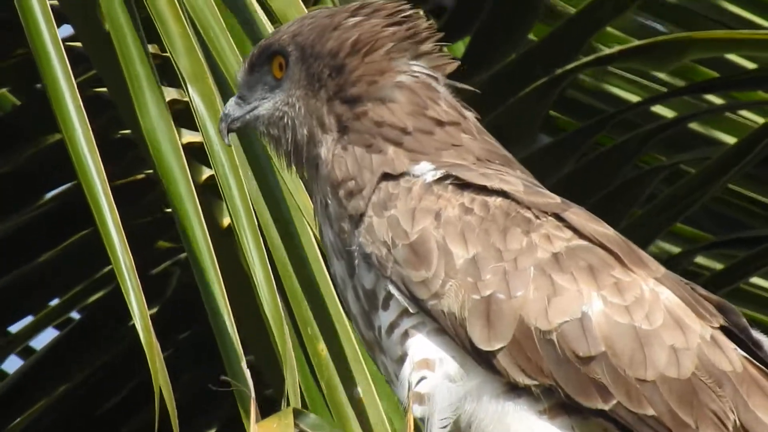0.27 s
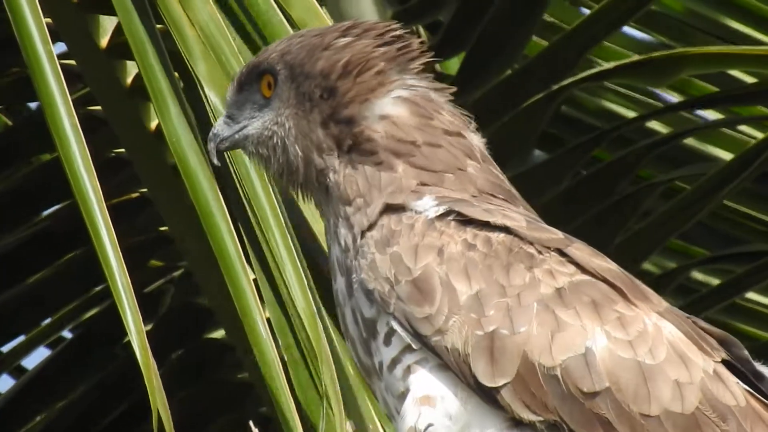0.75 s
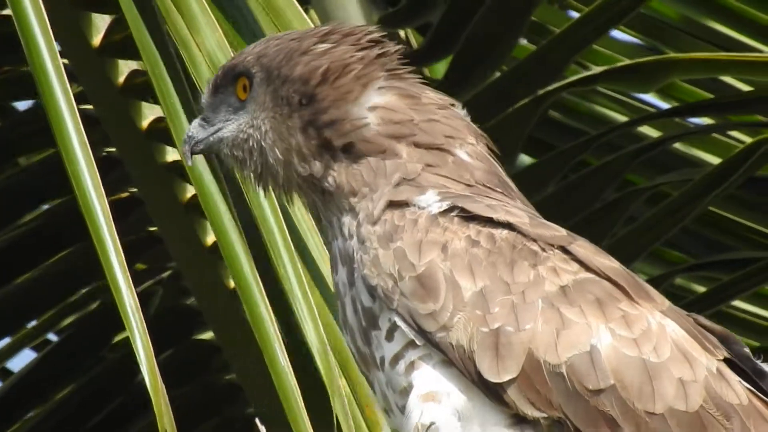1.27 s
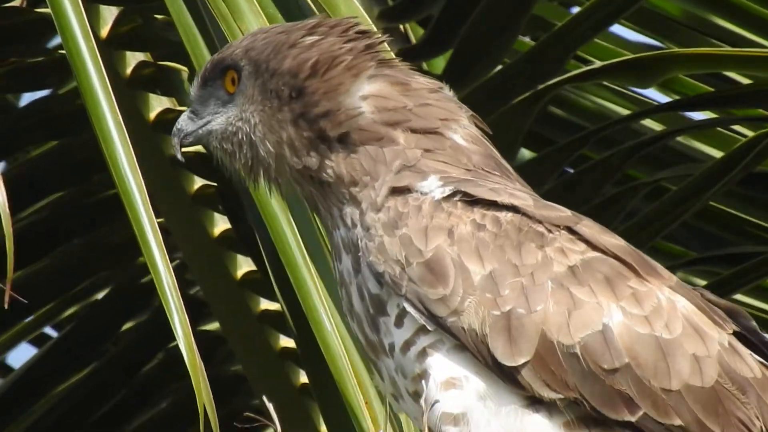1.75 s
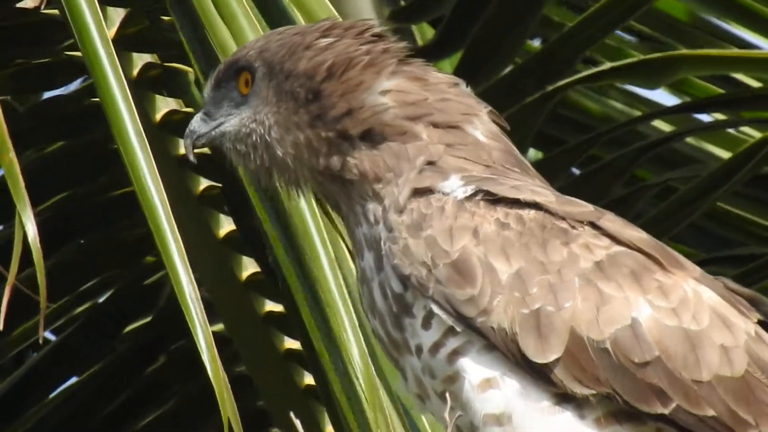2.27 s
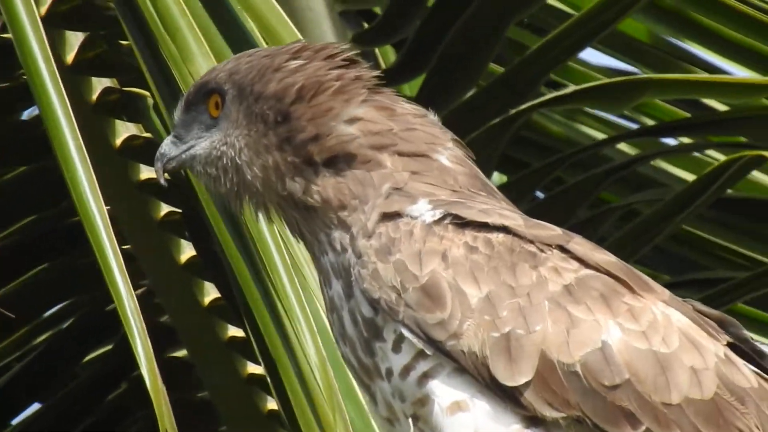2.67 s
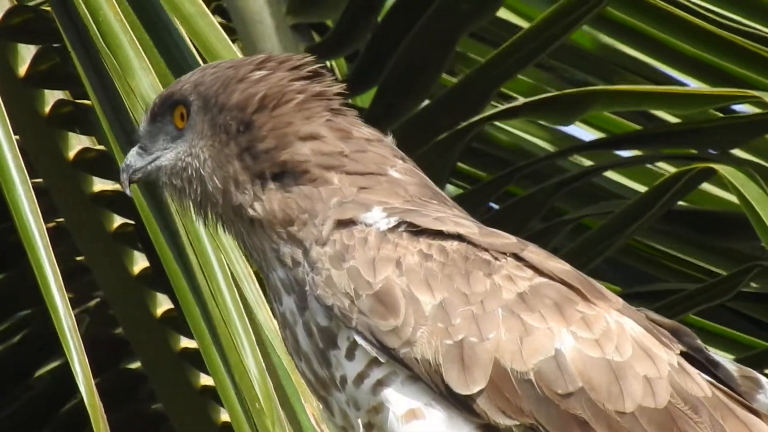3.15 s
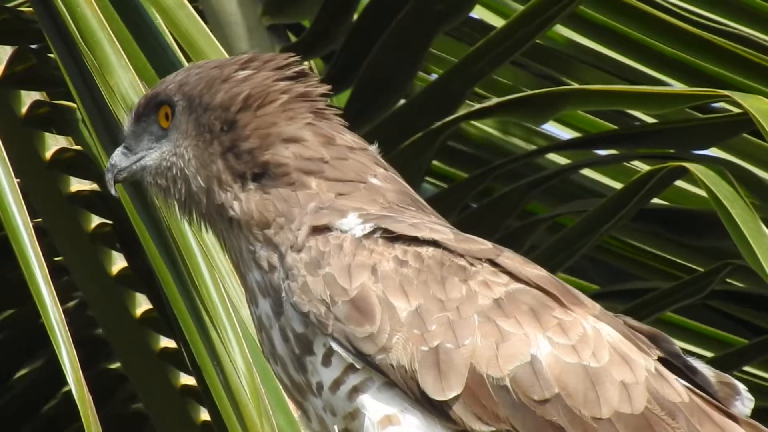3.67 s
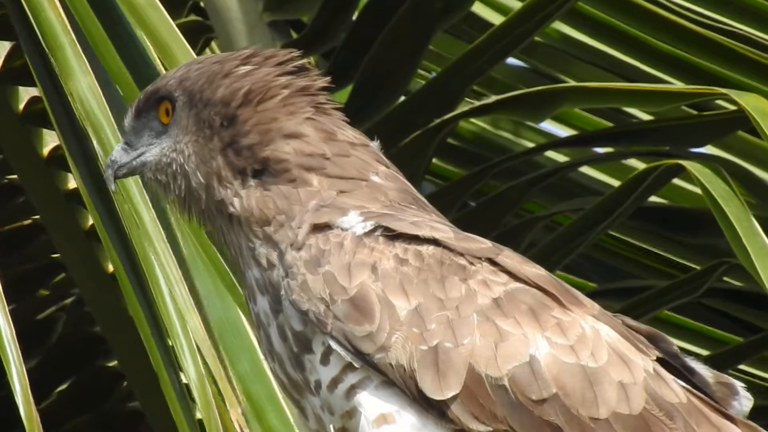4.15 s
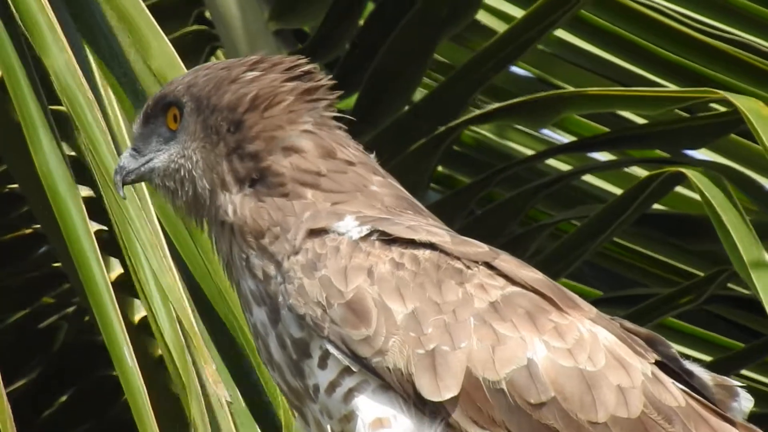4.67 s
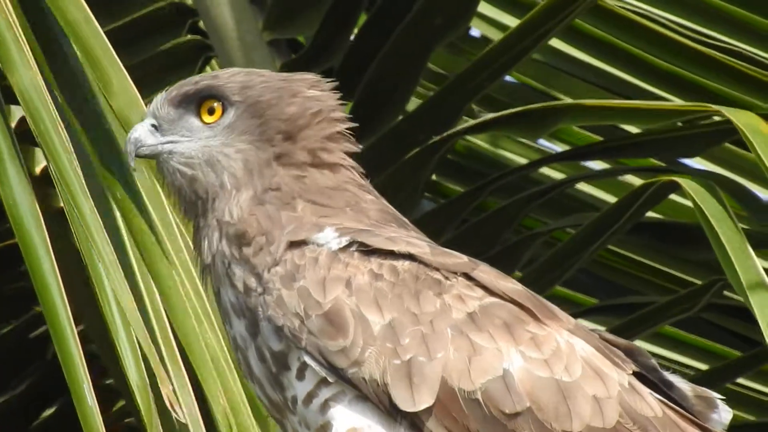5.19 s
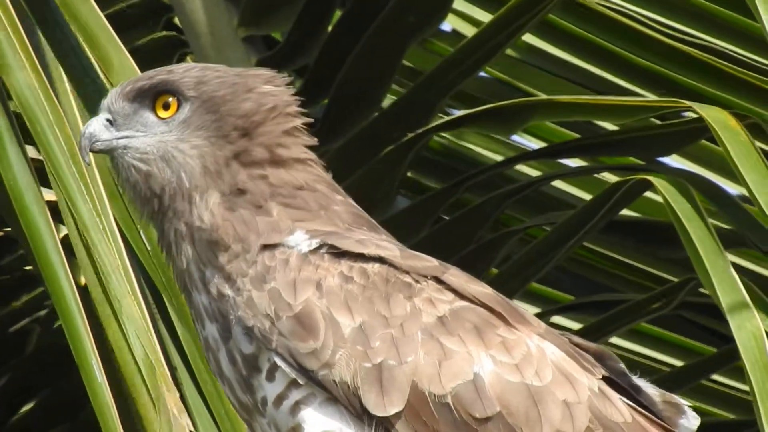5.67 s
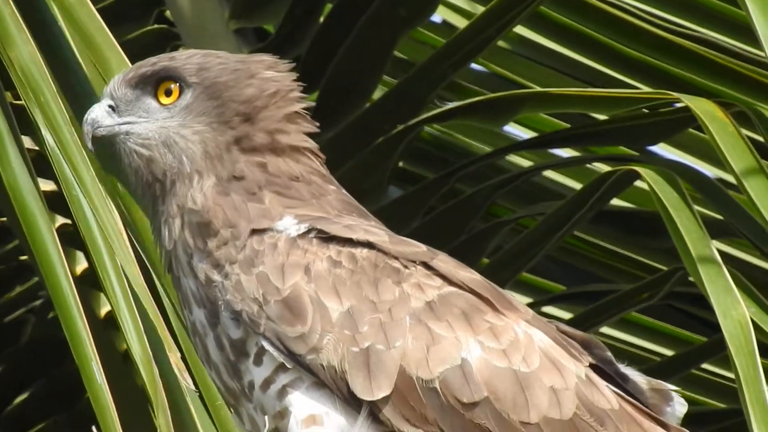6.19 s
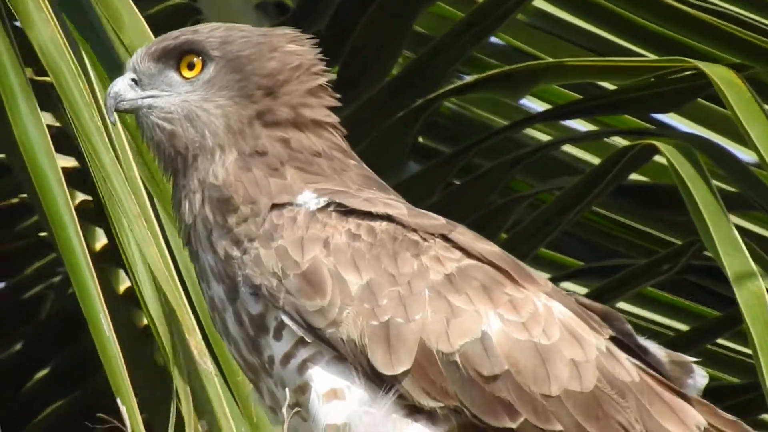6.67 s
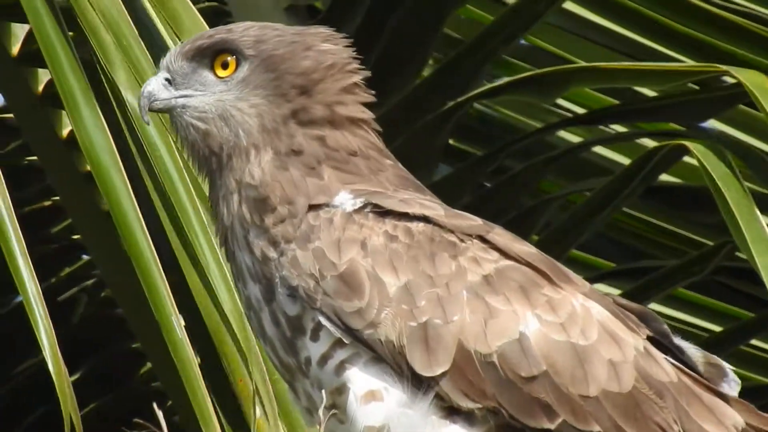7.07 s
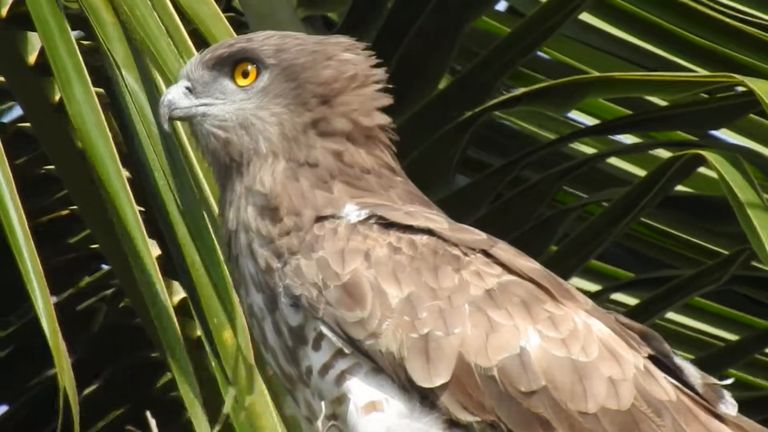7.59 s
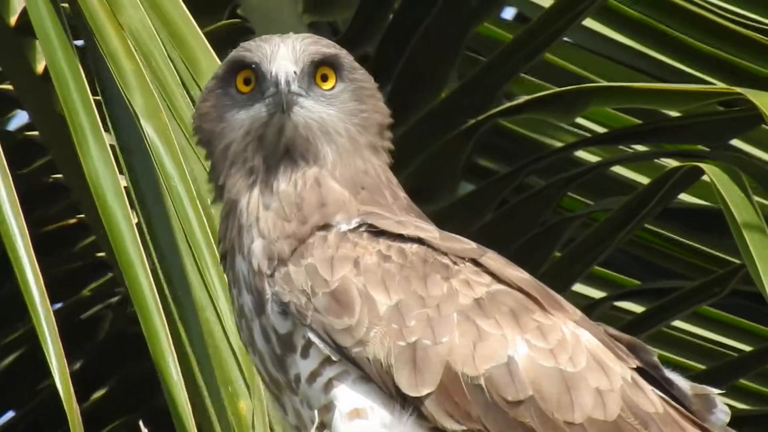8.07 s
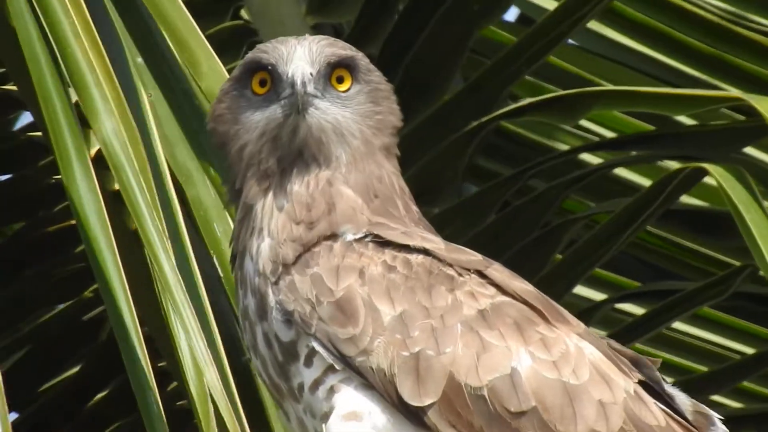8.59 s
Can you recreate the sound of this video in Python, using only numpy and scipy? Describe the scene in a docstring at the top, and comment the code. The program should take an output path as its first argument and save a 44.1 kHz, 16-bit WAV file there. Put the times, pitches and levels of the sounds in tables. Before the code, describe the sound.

Outdoors among palm leaves, agitated small birds scold almost without pause. Short, harsh, rising squawks stand out slightly right, a buzzing churr bursts on the left, and hoarse rasps, thin chips and low coos sit behind. A far engine chugs quickly and evenly as a vehicle drone fades. One soft knock touches the left of the close stereo microphone at about two seconds.

```python
"""Small birds scold from the palms: squawks and rasps on the right, a churring bird on the left,
with thin chips, deeper coos and far croaks. Squawks are voiced pulses and breath through moving resonances;
rasps and coos are uneven clicks, churrs gated noise, croaks slow pulses, chips whistles.
A far single-cylinder pump engine thumps and a vehicle drones off, both sums of sines; patchy noise is the
open air, and one soft knock lands on the left of two close microphone ports."""
import sys
import numpy as np
from scipy import signal
from scipy.fft import rfft, irfft, next_fast_len
from scipy.io import wavfile
from scipy.ndimage import uniform_filter1d

SR = 44100
rng = np.random.default_rng(int(sys.argv[2]) if len(sys.argv) > 2 else 0)


def waveform_to_disk(signal):
    """Save audio, clipped to [-1, 1], as 16-bit WAV at the path in sys.argv[1]."""
    frames = np.transpose(np.atleast_2d(signal))
    scaled = np.clip(frames, -1, 1) * 32767
    samples = np.round(scaled).astype(np.int16)
    wavfile.write(sys.argv[1], SR, samples)


N = 389403
T = np.arange(N) / SR


def gain_of(db):
    """Decibels to an amplitude factor."""
    return 10 ** (np.asarray(db) / 20)


def gain_of_ports(db):
    """Level offset of the two ports: left down, right up by db."""
    return gain_of([[-db], [db]])


def evened(x):
    """Scale to unit power."""
    return x / np.sqrt(np.mean(x ** 2) + 1e-20)


def read(points, hz):
    """Interpolate a spectrum table over log frequency."""
    f, value = np.transpose(points)
    return np.interp(np.log(hz + 1), np.log(f + 1), value)


def curves(rows):
    """Interpolate each column of a time table to one value a sample."""
    s, *columns = np.transpose(rows)
    return [np.interp(T, s, c) for c in columns]


def wander(seconds):
    """Smooth random drift of unit power: noise averaged twice."""
    size = max(round(seconds * SR), 1)
    noise = rng.standard_normal(N)
    return evened(uniform_filter1d(uniform_filter1d(noise, size), size))


def resonate(x, hz, width_hz):
    """Steep resonance: shift hz down to zero, smooth twice, shift back."""
    turn = np.exp(2j * np.pi * np.cumsum(hz * np.ones(N)) / SR)
    r = np.exp(-np.pi * width_hz / SR)
    smooth = signal.lfilter([1], [1, -2 * r, r * r], x / turn)
    return evened((turn * smooth).real)


def throat(x, modes):
    """Several resonances side by side, summed to unit power."""
    return evened(sum(gain_of(db) * resonate(x, hz, width_hz) for hz, width_hz, db in modes))


def placed(x, left_lag_samples, left_db, wet_db):
    """Bird at an angle: left port lagged and scaled; leaves scatter a short tail, other in each port."""
    size = next_fast_len(N)
    delay = np.exp(-2j * np.pi * np.fft.rfftfreq(size) * left_lag_samples)
    left = gain_of(left_db) * irfft(rfft(x, size) * delay, size)[:N]
    t = np.arange(SR // 4) / SR
    decay = gain_of(-60 * t / .13) * (t > .003)  # 60 dB in .13 s, from 3 ms on
    tail = rng.standard_normal((2, len(t))) * decay
    tail *= gain_of(wet_db) / np.linalg.norm(tail[0])
    return np.array([left, x]) + signal.oaconvolve(x[None], tail, axes=1)[:, :N]


# left-right likeness of the air: [f/Hz, share]
AIR_LIKENESS = [(60, 0.95), (240, 0.41), (900, 0.92), (2500, 0.76), (5000, 0.3), (9000, 0.035)]
# shape of the air spectrum: [f/Hz, relative density/dB per Hz]
AIR_SPECTRUM = [(25, -15), (54, -3), (155, -4.5), (277, -22), (589, -20.5), (1410, -17.5), (2080, -12.5),
                (4320, -16), (6370, -20.5), (8320, -25.5), (10800, -23.5), (15700, -35)]
# brief level changes, mostly dips, in the air's treble: [middle t/s, half length/s, level/dB]
LULLS = [(0.038, 0.043, -11), (0.486, 0.029, -14), (1.722, 0.024, -4), (1.997, .03, -8), (2.924, 0.031, -1),
         (3.839, 0.029, -4.5), (4.019, 0.026, -2), (5.015, 0.041, -1.5), (6.126, 0.021, -1.5),
         (6.367, .03, -5), (8.099, 0.037, -5), (8.549, 0.042, 0.5)]
AIR_DB = -42.5  # before the .7 dB port offset


def air():
    """Distant calls, leaves and rumble blur into patchy noise, shaped frame by frame."""
    frames, hz = N // 256 + 5, np.fft.rfftfreq(1024, 1 / SR)
    a, b, c, d, patches = rng.standard_normal((frames, 513, 5)).T
    patches = evened(uniform_filter1d(uniform_filter1d(patches, 10, 0), 12, 1))
    same = np.clip(read(AIR_LIKENESS, hz), -1, 1)[:, None]
    left = a + 1j * b
    right = same * left + np.sqrt(1 - same ** 2) * (c + 1j * d)
    spectrum = np.array([left, right])
    below_9k = (hz < 9000)[:, None]
    patch_db = 3.6 * patches * np.clip(hz / 1500, .3, 1)[:, None] * below_9k
    spectrum *= gain_of(read(AIR_SPECTRUM, hz)[:, None] + patch_db)
    t = np.arange(frames) * 256 / SR
    lull_db = sum(db * np.exp(-((t - s) / half_s) ** 2) for s, half_s, db in LULLS)
    spectrum *= gain_of(lull_db * np.clip(hz / 1200 - .3, 0, 1)[:, None] * below_9k)
    noise = signal.istft(spectrum, nperseg=1024, noverlap=768)[1][:, :N]
    return gain_of(AIR_DB) * evened(noise) * gain_of_ports(.7)


# vehicle, main line: [t/s, f/Hz, relative level/dB]
DRONE = [(0, 145.4, -50), (1.4, 141.6, -51), (2.6, 142.8, -54.5), (4.3, 148.3, -56), (5.8, 149.4, -62),
         (8.83, 158, -104)]


def vehicle():
    """Two unsteady lines in a fixed ratio; the pitch sags, then rises as the main line fades."""
    hz, db = curves(DRONE)
    turns = np.cumsum(hz * (1 + 0.00805 * wander(0.14))) / SR
    main = np.sin(2 * np.pi * turns)
    lower = gain_of(-6.5 + 1.4 * T) * np.sin(2 * np.pi * .795 * turns)
    return np.sqrt(2) * gain_of(db + 1.1 * wander(0.13)) * (main + lower)


# pump engine speed: [t/s, firings/Hz]
PUMP_SPEED = [(0, 8.752), (1, 8.755), (2, 8.776), (4, 8.784), (5, 8.762), (6, 8.75), (8.83, 8.749)]
# pump spectrum: [multiple of the firing rate, relative level/dB]
PUMP_ORDERS = [(4, -65), (5, -56), (6, -66), (7, -54), (8, -56), (9, -59), (10, -58), (11, -62), (12, -64),
               (13, -65), (15, -65), (17, -66)]
PUMP_LAG_CYCLES = .09  # first thump


def pump_engine():
    """All orders of the firing rate meet once a cycle in a thump."""
    turns = np.cumsum(curves(PUMP_SPEED)[0]) / SR - PUMP_LAG_CYCLES
    orders, order_db = np.transpose(PUMP_ORDERS)
    pump = 0
    for k in range(4, 18):
        pump = pump - gain_of(np.interp(k, orders, order_db)) * np.cos(2 * np.pi * k * turns)
    return np.sqrt(2) * pump * gain_of(-1.34 + 1.2 * wander(0.07))


# soft knock on the left port: [t/s, f/Hz, level/dB]
BUMP = (2.11, 85, -31)


def bump():
    """One short low swing, weaker and opposed in the right port."""
    s, hz, db = BUMP
    swing = np.exp(-((T - s) / 0.015) ** 2) * np.sin(2 * np.pi * hz * (T - s))
    return gain_of(db) * swing * [[1], [-.3]]


# [start t/s, length/s, pulse rate/Hz, relative level/dB]
CROAKS = [(6.56, .2, 77, -41), (7.535, .225, 77, -36)]
# [f/Hz, width/Hz, relative level/dB]
CROAK_THROAT = [(1010, 90, 0), (1400, 90, -2), (1850, 100, -1), (3100, 200, -5)]


def croaks():
    """Slow even pulses, each ringing a large throat."""
    pulses = np.zeros(N)
    for start, length, per_s, db in CROAKS:
        s = np.arange(0, length, 1 / per_s)
        arch = np.sin(np.pi * (s + 0.014) / (length + 0.029)) ** .5
        size = gain_of(db + 2 * rng.standard_normal(len(s)))
        pulses[((start + s) * SR).astype(int)] = size * arch
    t = np.arange(900) / SR
    ring = sum(gain_of(db) * np.exp(-np.pi * width_hz * t) * np.sin(2 * np.pi * hz * t)
               for hz, width_hz, db in CROAK_THROAT)
    return signal.oaconvolve(pulses, ring * np.clip(t / .002, 0, 1))[:N]


# [start t/s, relative level/dB]
CHIPS = [(.05, -42), (1.985, -41), (3.495, -43), (3.87, -42), (5.085, -42.5), (5.461, -41), (6.25, -39.5),
         (8.601, -39.5)]
# course of one chip: [t/s, f/Hz, level/dB re chip]
CHIP_SONG = [(0, 4550, 3), (.02, 4540, 4), (0.038, 4100, 2.5), (.05, 4100, -16), (.065, 4560, -3),
             (.11, 4450, -17)]


def chips():
    """A thin whistle that drops, then a fainter, nearly flat one."""
    out = np.zeros(N)
    s, hz, db = np.transpose(CHIP_SONG)
    t = np.arange(0, s[-1], 1 / SR)
    phase = 2 * np.pi * np.cumsum(np.interp(t, s, hz)) / SR
    tone = (np.sin(phase) + .12 * np.sin(2 * phase)) * signal.windows.tukey(len(t), .1)
    for start, level_db in CHIPS:
        out[round(start * SR):][:len(t)] += gain_of(level_db + np.interp(t, s, db)) * tone
    return out


def hoarse(calls, modes, clicks_per_s):
    """Uneven clicks and noise ring a throat that tightens, then eases a little, as each call swells."""
    t = T[::44]
    level, tight = np.zeros(len(t)), np.ones(len(t))
    for start, end, db in calls:
        u = np.clip((t - start) / (end - start), 0, 1)
        attack = np.clip((t - start) / 0.016, 0, 1)
        release = np.clip((end + 0.016 - t) / 0.049, 0, 1)
        level += gain_of(db + 5.6 * u) * attack * release
        tight += .06 * (np.sin(2.4 * u) - .7) * (u > 0) * (u < 1)
    level, tight = np.interp(T, t, level), np.interp(T, t, tight)
    turns = np.cumsum(clicks_per_s * (1 + .35 * wander(.004))) / SR
    clicks = (np.diff(turns // 1, prepend=0) > 0) * gain_of(0.98 * rng.standard_normal(N))
    drive = evened(clicks) + .5 * rng.standard_normal(N)
    return level * throat(drive, [(hz * tight, width_hz, db) for hz, width_hz, db in modes])


# deeper caller far off: [start t/s, end t/s, relative level at start/dB]
COO = [(2.94, 3.04, -45.5), (3.39, 3.51, -47), (3.57, 3.8, -52), (3.86, 3.97, -44.5), (4.05, 4.22, -46),
       (4.32, 4.46, -44.5), (4.54, 4.72, -48.5), (5.08, 5.27, -53), (5.5, 5.72, -53), (8.62, 8.8, -52)]
# [f/Hz, width/Hz, relative level/dB]
COO_THROAT = [(660, 60, -19), (1300, 130, -11), (1630, 140, 0)]


def coos():
    """Slower clicks in a low throat."""
    return hoarse(COO, COO_THROAT, 210)


# hoarse calls, beak nearly shut: [start t/s, end t/s, relative level at start/dB]
RASP = [(.08, .48, -44.5), (.51, .62, -49.5), (.7, .9, -42), (1.1, 1.2, -43), (1.22, 1.36, -42),
        (1.5, 1.68, -51), (1.78, 1.93, -45.5), (2.18, 2.48, -42), (2.62, 2.74, -40), (2.76, 2.9, -39),
        (3.17, 3.34, -40), (3.43, 3.51, -47), (3.6, 3.81, -40), (3.89, 3.97, -43), (4.08, 4.27, -36.5),
        (4.38, 4.5, -42), (4.54, 4.73, -35.5), (4.79, 4.86, -36), (5.07, 5.27, -39.5), (5.3, 5.45, -40),
        (5.52, 5.72, -37), (5.74, 5.83, -37), (6.17, 6.25, -45), (6.58, 6.7, -43), (6.8, 6.86, -39),
        (7, 7.2, -47), (7.38, 7.5, -39), (8.13, 8.33, -40.5), (8.35, 8.48, -40), (8.6, 8.85, -44.5)]
# [f/Hz, width/Hz, relative level/dB]
RASP_THROAT = [(2080, 110, 0), (2680, 200, -14), (3280, 260, -5), (6170, 320, -10)]


def rasps():
    """Faster clicks in the higher throat of a nearly shut beak."""
    return hoarse(RASP, RASP_THROAT, 330)


# [first burst t/s, last burst t/s, burst rate/Hz, relative level/dB, share left between bursts]
CHURRS = [(.155, .32, 54.5, -35, .35), (.542, .85, 54.6, -33, .2), (2.563, 2.66, 56, -30, .25),
          (2.663, 2.81, 57, -31, .35), (3.024, 3.2, 56, -32, .25), (4.222, 4.51, 55.5, -34, .25),
          (4.603, 4.8, 56.5, -32, .4), (6.925, 7.19, 56.9, -34, .25), (7.31, 7.525, 55.5, -32, .25),
          (7.689, 7.89, 54.5, -31, .15)]
# [f/Hz, width/Hz, relative level/dB]
CHURR_THROAT = [(4640, 560, -4.5), (6160, 690, -3.5), (6460, 1150, -7)]


def churrs():
    """Even bursts of noise, about half of each period long, with a sharp start."""
    gate = np.zeros(N)
    for first, last, per_s, db, between in CHURRS:
        turns = (T - first) * per_s + .3
        phase = turns % 1
        burst = np.clip(phase / .1, between, 1) * np.clip((.64 - phase) / .18, between, 1)
        swell = np.clip((T - first + .008) / .025, 0, 1) * np.clip((last + .02 - T) / .06, 0, 1)
        burst_gains = gain_of(db + 1.5 * rng.standard_normal(40))
        gate += burst * swell * burst_gains[np.clip(turns, 0, 39).astype(int)]
    return np.sqrt(np.mean(gate ** 2)) * throat(gate * rng.standard_normal(N), CHURR_THROAT)


# one row a squawk, or a rough start and clear end in neighbouring rows:
# [full voice t/s, swell/s, hold/s, effort level/dB, open beak f/Hz,
# upper resonance level/dB re effort, top pitch f/Hz, roughness at full voice 0-1]
SQUAWKS = [(0.283, 0.13, 0.02, -26, 3950, -6, 743.6, 0.64),
           (0.428, 0.12, 0.021, -34.5, 4000, 0.5, 748.6, 0.59),
           (0.834, .16, 0.056, -24.5, 4150, -4, 850, 0.67), (1.0, 0.078, 0.034, -20, 4207, -4, 987, .42),
           (1.052, 0.053, 0.038, -23, 4503, -2.5, 944, 0.29),
           (1.192, 0.09, 0.043, -31.5, 4280, -4, 831, 0.6), (1.324, 0.12, 0.026, -27, 4160, -2, 801, 0.55),
           (1.372, .04, 0.05, -22.5, 4420, -11.5, 907, .25), (1.647, .1, 0.016, -25, 4410, -1, 836, 0.61),
           (1.85, 0.076, 0.084, -23, 4410, -5.5, 959.8, .4),
           (2.098, 0.073, .045, -23.5, 4386, -5, 889, 0.39),
           (2.304, 0.075, 0.069, -24, 4370, -6, 880.5, 0.39), (2.5, .09, 0.048, -23.5, 4350, -4, 952.7, .4),
           (2.695, 0.28, 0.029, -34.5, 4300, -15, 842, 0.7), (3.3, 0.29, 0.022, -46.5, 3500, -12, 596, .58),
           (3.768, 0.12, .02, -41, 3365, -2.5, 562, 0.47),
           (3.952, 0.069, 0.014, -41.5, 4040, -23, 774, .58),
           (4.165, .15, 0.23, -41, 3714, -6, 653.5, 0.44), (4.497, 0.15, 0.0098, -27, 4540, -1, 911.5, .58),
           (4.605, 0.094, .11, -42, 3677, 2, 646.3, 0.62),
           (4.866, 0.039, 0.11, -26.5, 4063, -3, 779.4, 0.08),
           (5.133, 0.14, 0.27, -40, 3900, -2, 718.5, .58), (5.653, 0.19, .04, -42.5, 3514, 1, 601, .58),
           (5.845, .11, 0.03, -24.5, 4240, -1.5, 737.3, 0.58),
           (5.887, .06, .055, -27, 4120, -0.5, 773.4, 0.1),
           (6.008, .055, 0.056, -27, 4203, 3.5, 1006, 0.05), (6.218, .12, .015, -33.5, 4120, 2, 792, 0.61),
           (6.534, 0.11, 0.013, -26.5, 4685, -4, 977.4, .58),
           (6.715, 0.087, 0.013, -19, 4390, -1, 849, 0.42),
           (6.848, 0.037, 0.023, -24.5, 4120, -2, 881, .55), (6.889, .045, .04, -22.5, 4250, -1, 976, .15),
           (7.032, .15, .02, -34, 3890, -5, 721, 0.55), (7.262, 0.098, 0.051, -26.5, 4370, -6, 888.5, 0.33),
           (7.462, 0.14, 0.038, -25, 4470, -4.5, 904, 0.42), (8.025, 0.11, .02, -26, 4246, -6.5, 827, 0.66),
           (8.189, 0.07, 0.043, -27, 4373, -4.5, 868.6, 0.63),
           (8.314, 0.18, .015, -26.5, 4250, -2.5, 851.4, 0.56),
           (8.483, 0.13, .015, -22, 4390, -7, 910.5, 0.34),
           (8.806, 0.27, 0.027, -36, 3705, -6, 665.4, 0.74)]
HOARSE = .58  # roughness at the ends of a squawk, 0-1
SWELL_DB, SAG_DB = 15, 0.5  # gained over the swell, lost over the hold
STOP_DB_PER_S, CLEAN_STOP = 400, 1.5  # stop rate at HOARSE roughness; extra share for a clean voice
SHUT_BEAK = 0.901  # share of the open resonance at the start of the swell
START_PITCH, END_PITCH, TOP_AT = .78, .98, .84  # shares of top pitch; place of the top in the call
TO_FULL_S, FROM_FULL_S = .028, .012  # roughness moves from HOARSE to its full-voice value, and back


def loudest_squawk():
    """Effort, beak, upper level, pitch and roughness of whichever squawk is loudest at each moment."""
    t = np.arange(0, N / SR, .001)
    full, swell, hold, db, beak_hz, upper_db, pitch_hz, full_rough = np.transpose(SQUAWKS)[:, :, None]
    before = np.maximum(full - t, 0)
    after = np.maximum(t - full - hold, 0)
    swell_db = SWELL_DB * before / swell
    sag_db = SAG_DB * np.clip((t - full) / hold, 0, 1)
    stop_db = STOP_DB_PER_S * (1 + CLEAN_STOP * (1 - full_rough / HOARSE)) * after
    effort_db = db - swell_db - sag_db - stop_db
    u = (t - full + swell) / (swell + hold)
    shut = np.clip(1 - u / TOP_AT, 0, 1.5)
    past_top = np.clip((u - TOP_AT) / (1 - TOP_AT), 0, 1.6)
    beak_hz = beak_hz * (1 - (1 - SHUT_BEAK) * shut)
    pitch_hz = pitch_hz * (1 - (1 - START_PITCH) * shut ** 2 - (1 - END_PITCH) * past_top ** 2)
    fullness = np.exp(-(before / TO_FULL_S + after / FROM_FULL_S) ** 2)
    rough = HOARSE + (np.clip(full_rough, 0, 1) - HOARSE) * fullness
    lead = effort_db.argmax(0), np.arange(len(t))
    tracks = effort_db, beak_hz, upper_db + 0 * t, pitch_hz, rough
    return [np.interp(T, t, uniform_filter1d(c[lead], size=8)) for c in tracks]


def squawks():
    """Shaken syrinx pulses, mixed when rough with breath a little stronger at each pulse; beak opens."""
    effort_db, beak_hz, upper_db, pitch_hz, rough = loudest_squawk()
    turns = np.cumsum(pitch_hz * (1 + (.006 + .07 * rough) * wander(.004))) / SR
    pulses = evened(sum(np.cos(2 * np.pi * k * turns) for k in range(1, 15)))
    breath = evened((1.4 + np.exp(-(turns % 1) / 2.0)) * rng.standard_normal(N))
    flutter = gain_of(3 * np.sqrt(rough) * wander(.002))
    drive = (np.sqrt(1 - rough ** 2) * pulses + rough * breath) * flutter
    low = gain_of(-11) * resonate(drive, 2840, 730)
    low += gain_of(-19) * resonate(drive, 2397, 230)
    low += gain_of(-35.5) * resonate(drive, 930, 570)
    main = resonate(drive, beak_hz, 670) + gain_of(-19) * resonate(drive, beak_hz, 810)
    upper = resonate(drive, 6750 + 0.59 * (beak_hz - 4250), 1030)
    upper += gain_of(-20.5) * resonate(drive, 10570, 2700)
    return gain_of(effort_db) * (evened(main) + low + gain_of(upper_db) * upper)


def scene():
    """Birds left and right over engines, knock and air."""
    engines = (pump_engine() + vehicle()) * gain_of_ports(.6)
    far = rasps() + coos() + croaks() + chips()
    far_birds = placed(far, .6, -3.5, -9)
    left_bird = gain_of(4.5) * placed(churrs(), -2.1, .5, -7)
    right_bird = placed(squawks(), 1.4, -2.2, -7)
    return air() + engines + bump() + far_birds + left_bird + right_bird


DULL_HZ, EDGE_HZ = 7850, 15750  # treble loss above; band limit


def record(dry):
    """The microphone cuts the treble by up to 12.5 dB; then the band limit."""
    dull = signal.sosfiltfilt(signal.butter(5, DULL_HZ, fs=SR, output="sos"), dry)
    heard = dull + gain_of(-12.5) * (dry - dull)
    band = signal.firwin(511, EDGE_HZ, window=("kaiser", 9), fs=SR)
    return signal.oaconvolve(heard, band[None], "same")


dry = scene()
out = record(dry)
waveform_to_disk(out)
```